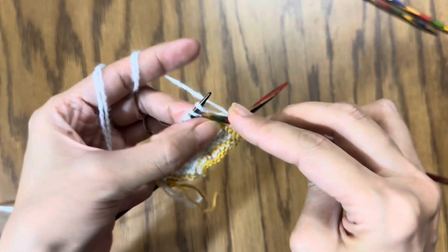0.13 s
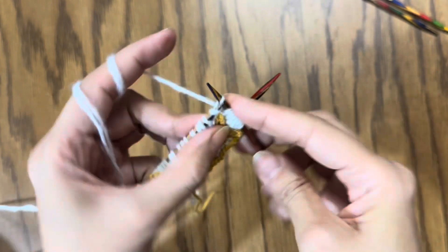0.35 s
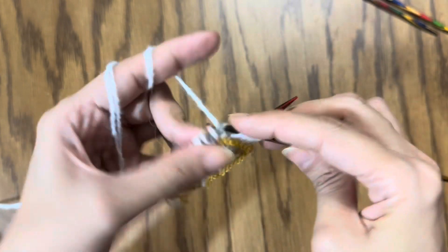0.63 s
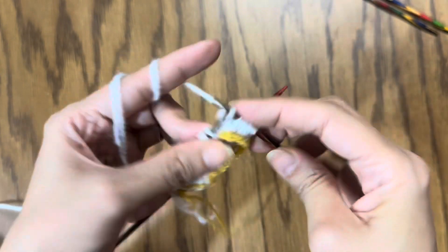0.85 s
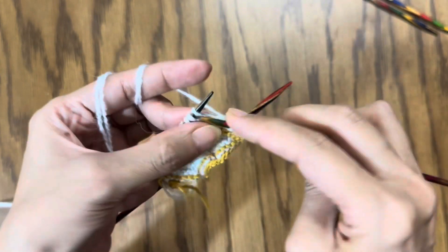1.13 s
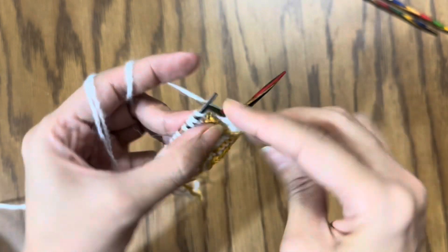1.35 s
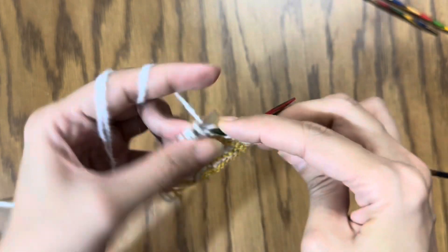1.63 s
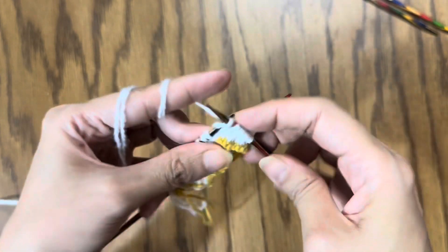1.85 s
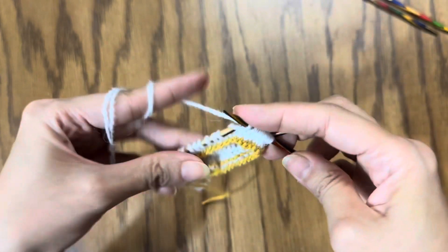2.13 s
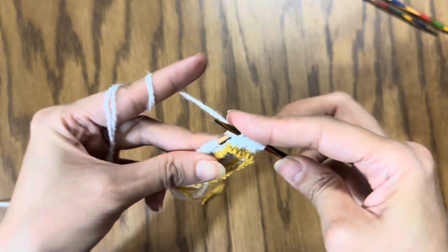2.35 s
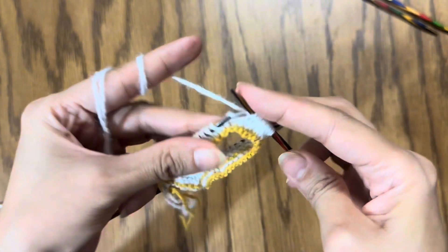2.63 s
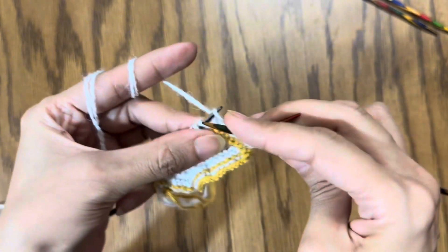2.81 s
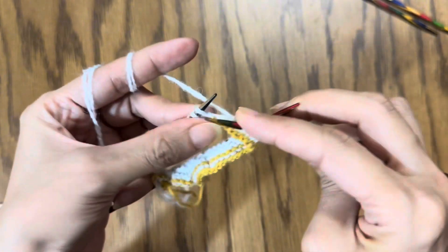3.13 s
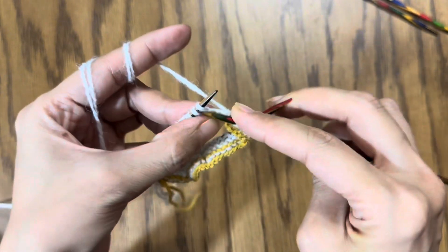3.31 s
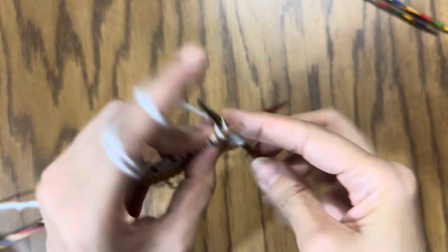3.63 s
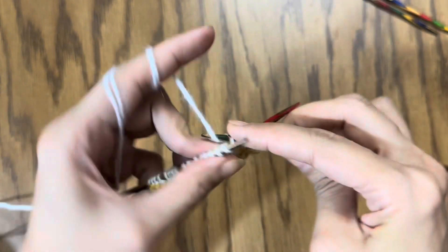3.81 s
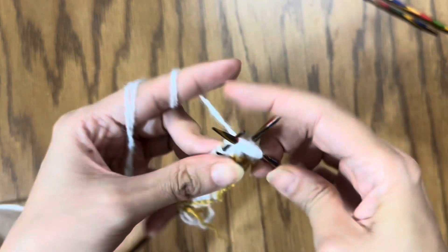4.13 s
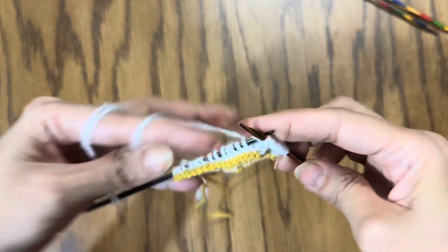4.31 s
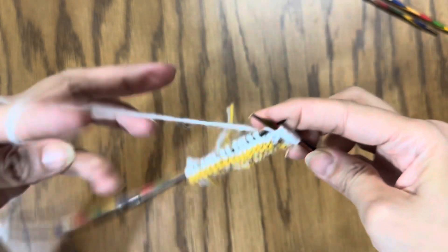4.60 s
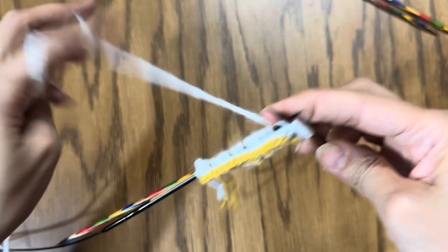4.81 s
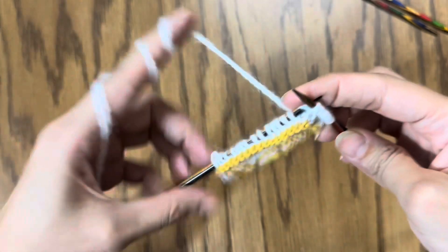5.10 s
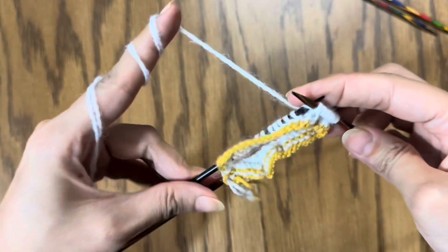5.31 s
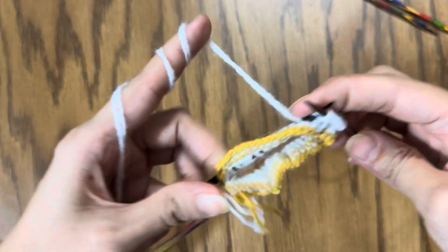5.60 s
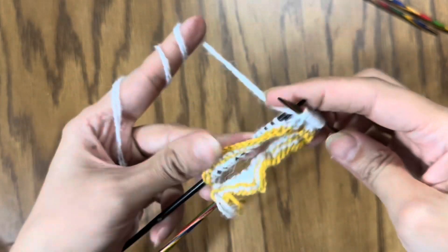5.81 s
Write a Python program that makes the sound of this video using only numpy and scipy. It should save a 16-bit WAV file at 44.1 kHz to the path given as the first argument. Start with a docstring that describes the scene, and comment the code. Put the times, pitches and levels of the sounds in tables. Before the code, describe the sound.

Needle tips scrape into loops, snap sideways with a dry click, then pull yarn through with a brief rasp and low shudder. Between stitches come light taps, fine high rustles and muffled grip changes. The sharpest clicks come before three seconds and just after five. The microphone is very near, with a short, dry room tail above soft low ventilation noise and a faint steady whine.

```python
"""Hand knitting just above a wooden table in a small, quiet room, heard from close by for six seconds.
Faint ventilation noise and an electrical whine run from start to end. Four stitches follow, at about
0.6, 1.6, 3.8 and 4.6 s: the tip rubs into a loop (swept scratching), snaps off the other needle with a
thump (clicks ringing the shafts and the work), then draws the yarn through as the work shudders (noise).
Needle taps, yarn rubs and soft hand bumps come in between; a last tap and a short rub end the scene."""
import sys
import numpy as np
from scipy import signal
from scipy.fft import rfft, irfft, next_fast_len
from scipy.io import wavfile

SR = 44100
rng = np.random.default_rng(int(sys.argv[2]) if len(sys.argv) > 2 else 0)


def pcm_store(signal):
    """Save signal as 16-bit PCM."""
    levels = np.round(np.clip(np.atleast_2d(signal), -1, 1) * 32767)
    wavfile.write(sys.argv[1], SR, levels.astype(np.int16).T)


N = 262395  # length in samples
SIZE = next_fast_len(N + SR // 2, real=True)  # padded so that filter tails do not wrap around
FREQS = np.arange(SIZE // 2 + 1) * SR / SIZE
TIME = np.arange(N) / SR
CUTOFF_HZ = 16400


def from_db(db):
    """Turn decibels into gain."""
    return 10 ** (np.asarray(db) / 20)


def rms_one(x):
    """Scale to rms 1."""
    return x / np.sqrt(np.mean(x ** 2) + 1e-20)


def over_hz(points):
    """Read a table at every frequency, with straight lines between its points on a log-frequency axis."""
    hz, value = np.transpose(points)
    return np.interp(np.log(FREQS + 1), np.log(hz), value)


def colour(x, spectrum):
    """Filter to the given spectrum without any sound ahead of its cause (minimum phase)."""
    cepstrum = irfft(np.log(from_db(over_hz(spectrum))), SIZE)
    cepstrum[0] /= 2
    response = np.exp(rfft(2 * cepstrum[:SIZE // 2], SIZE))
    return irfft(rfft(x, SIZE) * response, SIZE)[..., :N]


def ring(x, hz, t60):
    """Let clicks ring a resonance: a unit click starts a sine of height 1, 60 dB down after t60 seconds."""
    r = from_db(-60 / (t60 * SR))
    w = 2 * np.pi * hz / SR
    return signal.lfilter([0, np.sin(w)], [1, -2 * r * np.cos(w), r * r], x + 1e-18)


# a stroke catches faster than it lets go (shares of its length)
STROKE_RISE, STROKE_FALL = 0.85, 1.286


def swell(middle, length):
    """Lopsided bell of a stroke, above half power for about its length: its samples and its gains."""
    span = slice(max(0, int((middle - 2 * length) * SR)), int((middle + 3 * length) * SR))
    t = (TIME[span] - middle) / length
    side = np.where(t < 0, STROKE_RISE, STROKE_FALL)
    return span, 2 ** (-2 * (t / side) ** 2)


# how alike diffuse sound is in the left and right channels: (f/Hz, likeness 0-1)
CHANNEL_LIKENESS = [(60, .97), (250, .84), (700, .1), (1300, .82), (2200, .8), (4500, .6), (8500, .55),
                    (12000, .9), (15000, .6)]


def diffuse(pair):
    """Blend two unrelated signals into a partly alike left and right, as for sound from many directions."""
    alike = np.clip(over_hz(CHANNEL_LIKENESS), 0, .99)
    mid, side = rfft(pair, SIZE) * np.sqrt([(1 + alike) / 2, (1 - alike) / 2])
    return irfft([mid + side, mid - side], SIZE)[:, :N]


# stitches: (snap t/s, its tick level/dB, its ring level/dB, lead of the entering tip t/s,
# its rub level/dB, length of the draw t/s, glide level/dB, drag level/dB, shudder level/dB, shudder f/Hz)
STITCHES = [(0.5917, 8.5, -24, .268, -52.5, 0.099, -48.5, -44, -38, 230.3),
            (1.603, 8, -26, 0.23, -49, 0.09, -44.5, -43.5, -44, 194),
            (3.7872, 4.5, -27.5, .235, -49.5, 0.1, -48, -51, -55, 196),
            (4.6068, 0, -32, 0.21, -60.5, 0.047, -42.5, -43.5, -45.5, 197)]
# needle taps between the snaps: (t/s, tick of the tips level/dB, ring of the shafts level/dB,
# manner: 0 = slips off sideways, 1 = knocks head on, hollow knock f/Hz)
TAPS = [(0.4213, -9.5, -47, 0.16, 800), (1.343, -26, -47, .1, 799), (1.4556, -3.5, -43, 0.089, 805),
        (2.1375, -8.5, -40, 0.35, 810), (2.7634, 14, -26, 0.81, 788), (2.9297, -33, -34, 1, 693),
        (3.031, -42, -44, 0.87, 880), (3.058, -32, -53, 0.4, 800), (3.1252, -37, -43, 0.77, 1380),
        (3.313, -41, -46, 0.4, 800), (3.5821, -5, -42, 0.05, 800), (3.696, -23, -52, .1, 800),
        (3.9345, -16, -42, 0.43, 800), (4.931, -22, -46, .3, 800), (5.1116, 18.5, -26.5, 1, 870),
        (5.2284, -17, -42.5, 0.49, 800), (5.355, -22, -46, 0.35, 800), (5.8988, -17.5, -43, 0.29, 810)]


def needle_contacts():
    """The sideways snap of each stitch and the taps between: (t/s, tick level/dB, ring level/dB, manner)."""
    snaps = [(s, tick_db, ring_db, 0) for s, tick_db, ring_db, *_ in STITCHES]
    return snaps + [tap[:-1] for tap in TAPS]


# ways the hand-damped needles vibrate: (f/Hz, after a slip level/dB, after a knock level/dB,
# under sliding yarn level/dB, time to fall 60 dB t/s)
NEEDLE_MODES = [(678, -13.5, -20, -9, 0.046), (1068, -14.5, -52, -3.5, 0.066),
                (1405, -16.5, -22.5, 4, 0.055), (1652, -10.5, -5, -2, 0.011), (2077, -3, -8, 3.5, 0.018),
                (2220, -1.5, -17, -7, .013), (2563, -5, -40, 1, 0.018), (2735, -7.5, -40, -7, 0.032),
                (3070, -12.5, -24, -2.5, 0.017), (3505, -7.5, -10.5, -4, 0.018), (3955, -19, -28, -5, .014),
                (4455, -15, -17, -5, 0.013), (5120, -11, -7, -4.5, 0.018), (5720, -22, -20, -3.5, 0.012),
                (6430, -5.5, -13, 1, 0.017), (7140, -10.5, -8, -4, 0.017), (7990, -8, -30, -3, 0.012)]
# tick of the tips slipping off sideways: (f/Hz, level/dB)
SLIP_TICK = [(200, -34), (700, -22), (2000, -20), (4000, -19), (6000, -16), (7300, -13), (9000, -14),
             (11000, -10), (12500, -7), (14000, 0), (15200, -2), (16500, -17)]
# tick of the hard tips meeting head on: (f/Hz, level/dB)
HEAD_ON_TICK = [(200, -44), (550, -36), (900, -26), (1250, -36), (2000, -26), (2600, -35), (3400, -23),
                (4000, -27), (5000, -18), (7300, -15), (9000, -14), (11000, -8.5), (12500, -5), (14000, 1),
                (15200, -5), (16500, -24)]
# a tap whose tick stands less than HARD_TICK_DB over its ring is cushioned by yarn and loses high modes
HARD_TICK_DB, CUSHION_HZ, CUSHION_DB_PER_OCTAVE = 27, 1740, 10


def contacts(chatter_t60, chatter_db, mode_spread_db):
    """Each contact is a hard touch and a few ms of chatter; it ticks at the tips and rings the shafts."""
    t = TIME[:SR // 40]
    mode_hz, slip_db, knock_db, _, t60 = np.transpose(NEEDLE_MODES)
    tips, shafts = np.zeros((2, N)), np.zeros((len(mode_hz), N))
    for s, tip_db, shaft_db, manner in needle_contacts():
        at = round(s * SR)
        touch = rng.standard_normal(len(t)) * from_db(-60 * t / chatter_t60)
        touch *= from_db(chatter_db) / np.linalg.norm(touch)
        touch[0] = 1
        tips[int(manner > .5), at:at + len(t)] += from_db(tip_db) * touch[:N - at]
        # the manner and place of contact decide how strongly each mode answers
        mode_db = slip_db + np.clip(manner, 0, 1) * (knock_db - slip_db)
        cushion = np.clip(1 - (tip_db - shaft_db) / HARD_TICK_DB, 0, 1)
        octaves_above = np.maximum(np.log2(mode_hz / CUSHION_HZ), 0)
        mode_db -= cushion * CUSHION_DB_PER_OCTAVE * octaves_above
        place_db = mode_spread_db * rng.standard_normal(len(mode_hz))
        shafts[:, at] += from_db(shaft_db + mode_db + place_db)
    ticks = colour(tips[0], SLIP_TICK) + colour(tips[1], HEAD_ON_TICK)
    # neighbouring modes start in opposite directions
    rings = sum((-1) ** k * ring(shafts[k], hz, t60[k]) for k, hz in enumerate(mode_hz))
    return ticks + rings


# hollow knock of a head-on tap (level against its ring, time to fall 60 dB)
KNOCK_DB, KNOCK_T60_S = -1, 0.024


def knocks():
    """The more head on a tap lands, the more the needle bounces in the fingers: a knock pitched by the grip."""
    out, t = np.zeros(N), TIME[:SR // 20]
    for s, _, shaft_db, manner, hz in TAPS:
        at = round(s * SR)
        knock = np.sin(2 * np.pi * hz * t) * from_db(-60 * t / KNOCK_T60_S)
        out[at:at + len(t)] -= manner ** 2 * from_db(shaft_db + KNOCK_DB) * knock[:N - at]
    return out


BENDING_DELAY_S = .0028  # time a 1 kHz bending wave takes along the shaft


def dispersed(x):
    """Bending waves run down the shaft faster the higher their pitch, so a click chirps downward."""
    delay_s = BENDING_DELAY_S * np.sqrt(1000 / np.clip(FREQS, 600, CUTOFF_HZ))
    # delays count from the arrival of the fastest wave
    phase = 2 * np.pi * np.cumsum(delay_s - delay_s[-1]) * SR / SIZE
    return irfft(rfft(x, SIZE) * np.exp(-1j * phase), SIZE)[:N]


THUMP_DELAY_S = 0.00503  # from the snap to the thump of the work
# ways the held work vibrates: (f/Hz, against the snap's ring level/dB, time to fall 60 dB t/s)
THUMP_MODES = [(300.4, -7.5, 0.13), (331, -13, 0.15)]


def thumps():
    """Just after each snap a jolt sets the held work swinging in low tones that die quickly."""
    jolts = np.zeros(N)
    for s, _, ring_db, *_ in STITCHES:
        jolts[round((s + THUMP_DELAY_S) * SR)] = from_db(ring_db)
    return sum(from_db(db) * ring(jolts, hz, t60) for hz, db, t60 in THUMP_MODES)


# the draw first glides over the tip, then drags:
# (middle and length as shares of the draw, brightness 0-1, sweep in octaves)
DRAW_PHASES = [(0.28, 0.3, 0.96, -0.08), (.79, .28, 0.36, -0.37)]
# yarn pulled tight or shifted along a needle: (middle t/s, length t/s, level/dB,
# brightness: 0 = coarse drag, 1 = light glide, sweep in octaves)
RUBS = [(.435, 0.028, -53.5, .3, -0.52), (0.86, 0.059, -52.5, 0, -0.53), (1.065, 0.047, -59.5, 0, -0.16),
        (1.769, 0.051, -49, 0.088, -.2), (1.935, 0.021, -53, 0.21, -0.16), (1.982, 0.036, -46, 0.12, -0.07),
        (2.187, 0.056, -52, 0.75, 0.9), (2.378, 0.031, -55.5, 0.57, 0.075), (2.554, 0.058, -61, 1, -0.1),
        (3.046, 0.09, -60.5, 0.0, 0.036), (3.621, 0.036, -61.5, 1, -.3), (3.94, 0.013, -47.5, 0.99, -0.36),
        (4.097, .036, -54, 0, 0.49), (4.228, 0.032, -51.5, 0.1, -0.044), (4.297, 0.059, -58, 0.49, 0.1),
        (4.496, 0.049, -54, 0.3, -0.4), (4.6, 0.014, -50, 0.65, 0.54), (5.238, 0.02, -54, 0.79, -0.45),
        (5.94, 0.012, -59, 1, 0)]
# the entering tip starts bright and sweeps down
ENTRY_LENGTH_S, ENTRY_BRIGHTNESS, ENTRY_SWEEP_OCTAVES = 0.05, 1, -.6


def yarn_strokes():
    """Entry and draw of each stitch, and the rubs between, with the columns of RUBS."""
    strokes = []
    for s, _, _, lead_s, entry_db, draw_s, glide_db, drag_db, *_ in STITCHES:
        strokes.append((s - lead_s, ENTRY_LENGTH_S, entry_db, ENTRY_BRIGHTNESS, ENTRY_SWEEP_OCTAVES))
        for (middle, length, bright, sweep), db in zip(DRAW_PHASES, (glide_db, drag_db)):
            strokes.append((s + middle * draw_s, length * draw_s, db, bright, sweep))
    return strokes + RUBS


FIDGETS_PER_S, FIDGET_LENGTH_S, FIDGET_DB = 4.4, 0.005, -59.5


def fidgets():
    """The fingers never rest: faint rustles at random times and of any brightness, as in RUBS."""
    gaps, brightness = rng.random((2, 60))
    times = np.cumsum(2 * gaps / FIDGETS_PER_S)
    return [(s, FIDGET_LENGTH_S, FIDGET_DB, bright, 0)
            for s, bright in zip(times, brightness) if s < TIME[-1]]


def fibres(per_s, size_spread_db, clump_db):
    """Fibres catch and let go: dense tiny slips of uneven size, clumping as each ply passes."""
    sizes = from_db(size_spread_db * np.minimum(rng.exponential(1, (2, N)), 4))
    grip = np.interp(TIME * 110, np.arange(700), rng.standard_normal(700))  # 110 new values a second
    happens = rng.random((2, N)) < per_s / SR
    return from_db(clump_db * grip) * sizes * rng.standard_normal((2, N)) * happens


# singing modes: sharpness, and the share of the sweep by which they bend
SCRATCH_Q, MODE_BEND = 35, .17
SCRATCH_SPREAD_OCTAVES = 1.04  # how far around the centre the modes still answer


def sliding_ring(x, hz):
    """A narrow resonance whose pitch follows a curve; rms 1."""
    turn = np.exp(2j * np.pi * np.cumsum(hz) / SR)
    r = np.exp(-np.pi * np.mean(hz) / SCRATCH_Q / SR)
    # shift the pitch down to zero, smooth, and shift it back up
    smooth = signal.lfilter([1 - r], [1, -r], x * turn.conj())
    return rms_one((turn * smooth).real)


def scratch(slips, centre_hz, octaves):
    """Slips excite the needle modes around a sweeping centre; the modes bend along as the contact travels."""
    mode_hz, _, _, slide_db, _ = np.transpose(NEEDLE_MODES)
    distance = np.log2(mode_hz / centre_hz)[:, None] - octaves
    gains = from_db(slide_db)[:, None] / (1 + (distance / SCRATCH_SPREAD_OCTAVES) ** 4)
    gains /= np.linalg.norm(gains, axis=0)
    bend = 2 ** (MODE_BEND * octaves)
    return sum(gain * sliding_ring(slips, hz * bend) for gain, hz in zip(gains, mode_hz))


# colour of stitches dragged along a needle: (f/Hz, per Hz level/dB)
RASP = [(200, -1), (450, -11.5), (700, 1.5), (1100, 4.5), (1250, -5), (1500, 3), (2200, 1), (3200, 1),
        (4500, 1.5), (6200, -5.5), (9000, -13.5), (16000, -57)]
# colour of tips and skin gliding over yarn: (f/Hz, per Hz level/dB)
HISS = [(1000, -20), (4000, -8), (7000, -2), (9500, -4), (12000, -2), (14000, 2), (15600, 2), (16300, -18)]
# the lighter the stroke, the higher and stronger its scratch and the more hiss against rasp
SCRATCH_HZ, SCRATCH_RISE_OCTAVES = 1640, 1.69
SCRATCH_DB, SCRATCH_RISE_DB = -3, 9  # against the rasp; rise from coarse to light
HISS_DB, HISS_RISE_DB = -18, 13.5  # against the stroke; rise from coarse to light


def slides():
    """Stitches dragged along a needle rasp and make its modes sing; tips and skin gliding over yarn hiss."""
    slips = rms_one(colour(fibres(per_s=6000, size_spread_db=1.2, clump_db=2.1), RASP))
    out, hiss_power = np.zeros((2, N)), np.zeros(N)
    for middle, length, rasp_db, brightness, sweep in yarn_strokes() + fidgets():
        hiss_db = rasp_db + HISS_DB + HISS_RISE_DB * brightness
        scratch_hz = SCRATCH_HZ * 2 ** (SCRATCH_RISE_OCTAVES * np.clip(brightness, 0, 1))
        span, stroke = swell(middle, length)
        octaves = sweep * (TIME[span] - middle) / length
        singing = scratch(slips[:, span], scratch_hz, octaves)
        singing_gain = from_db(SCRATCH_DB + SCRATCH_RISE_DB * brightness)
        rasp = rms_one(slips[:, span]) + singing_gain * singing
        out[:, span] += from_db(rasp_db) * stroke * rms_one(rasp)
        hiss_power[span] += (from_db(hiss_db) * stroke) ** 2
    hiss = rms_one(colour(fibres(per_s=17000, size_spread_db=1, clump_db=2.5), HISS))
    return diffuse(out + np.sqrt(hiss_power) * hiss)


# a needle skates lightly through the yarn: (middle t/s, length t/s, level/dB)
SKATES = [(.305, .025, -58), (.85, .06, -61), (1.265, .02, -62), (1.555, .008, -58), (2.21, .04, -52.5),
          (2.38, .028, -46), (2.735, .025, -58), (3.45, .05, -65), (3.55, .04, -54), (4.112, .03, -53),
          (4.28, .08, -62), (4.43, .025, -56), (5.38, .02, -60)]
# colour of the skating: (f/Hz, per Hz level/dB)
SKATE_COLOUR = [(1000, -30), (4000, -14), (7000, -8), (9500, -6), (12000, -2), (14000, 2), (15600, 1),
                (16300, -18)]
# high hiss of the yarn during the drag (middle and length as shares of the draw, dB against the drag)
DRAG_HISS_MIDDLE, DRAG_HISS_LENGTH, DRAG_HISS_DB = .78, .26, -8.5


def skating():
    """Polished wood skates through the yarn, and the yarn hisses during each drag: fine, grainy, very high."""
    drags = [(s + DRAG_HISS_MIDDLE * draw_s, DRAG_HISS_LENGTH * draw_s, drag_db + DRAG_HISS_DB)
             for s, _, _, _, _, draw_s, _, drag_db, *_ in STITCHES]
    power = np.zeros(N)
    for middle, length, db in SKATES + drags:
        span, stroke = swell(middle, length)
        power[span] += (from_db(db) * stroke) ** 2
    grains = rms_one(colour(fibres(per_s=9000, size_spread_db=1, clump_db=1.8), SKATE_COLOUR))
    return diffuse(np.sqrt(power) * grains)


# dull bumps as the hands change their grip, and the short low body of the needle knock at 2.93 s: (middle t/s,
# length t/s, level/dB, f/Hz, relative width)
GRIP_BUMPS = [(0.09, 0.039, -52.5, 169, 0.36), (0.775, 0.029, -48, 190, .4), (0.96, 0.12, -51, 137, 0.74),
              (1.84, 0.051, -47, 140, 0.49), (2.027, 0.043, -45, 107, 0.66), (2.627, 0.043, -47, 109, 0.4),
              (2.73, 0.048, -49, 151, 0.46), (2.93, 0.004, -42, 500, 0.35), (2.954, 0.03, -42.5, 186, 0.34),
              (3.027, 0.04, -42, 172, 0.25), (3.2, .04, -51.5, 140, 0.37), (4.12, 0.012, -38.5, 60, 0.51),
              (4.3, .051, -44, 132, 0.55), (4.67, 0.031, -48, 216, 0.36), (4.78, 0.029, -52, 160, 0.34),
              (4.915, 0.085, -46.5, 113, 0.58), (5.11, 0.034, -43.5, 109.4, 0.1),
              (5.302, 0.014, -43.5, 122, 0.36)]
# the work shudders through the draw (middle and length as shares of the draw, relative width)
SHUDDER_MIDDLE, SHUDDER_LENGTH, SHUDDER_WIDTH = .6, .5, 0.069
# every stroke of yarn also shakes the work (dB against the stroke)
SHAKE_DB, SHAKE_HZ, SHAKE_WIDTH = 0, 161, 0.55


def pushes():
    """Shudder of each stitch, the shake of each stroke, and the grips, with the columns of GRIP_BUMPS."""
    shudders = [(s + SHUDDER_MIDDLE * draw_s, SHUDDER_LENGTH * draw_s, db, hz, SHUDDER_WIDTH)
                for s, *_, draw_s, _, _, db, hz in STITCHES]
    shakes = [(s, length, db + SHAKE_DB, SHAKE_HZ, SHAKE_WIDTH)
              for s, length, db, *_ in yarn_strokes()]
    return shudders + shakes + GRIP_BUMPS


def bumps():
    """Soft pushes shake the held work in a low, damped resonance: noise in a low band."""
    out = np.zeros(N)
    for middle, length, db, hz, width in pushes():
        span, stroke = swell(middle, length)
        band = [hz / (1 + width), hz * (1 + width)]
        body = signal.butter(2, band, "band", fs=SR, output="sos")
        # keep the end of a second of noise, once the filter has settled
        push = stroke * signal.sosfilt(body, rng.standard_normal(SR))[-len(stroke):]
        out[span] += from_db(db) * push * np.linalg.norm(stroke) / np.linalg.norm(push)
    return out


# colour of the room tail, weak at the very top: (f/Hz, level/dB)
ROOM_COLOUR = [(300, -2), (600, -2), (1000, -3), (3000, -1), (7500, -1), (10000, -1), (12500, -6),
               (14000, -10.5), (16000, -11)]
ROOM_T60_S, ROOM_DB = 0.17, -10


def room(x, build_s):
    """Dense reflections build up within a few ms and die quickly, weak at the very top."""
    t = TIME[:SR // 2]
    tail = rng.standard_normal((2, len(t))) * from_db(-60 * t / ROOM_T60_S) * (1 - np.exp(-t / build_s))
    tail /= np.linalg.norm(tail, axis=1, keepdims=True)
    coloured = colour(x, ROOM_COLOUR)
    return from_db(ROOM_DB) * diffuse(signal.fftconvolve(coloured[None], tail, axes=1)[:, :N])


# colour of the room air: (f/Hz, per Hz level/dB)
AIR_COLOUR = [(20, -28), (50, 1.5), (112, 0), (160, -4.5), (235, -3.5), (320, -9.5), (450, -17), (900, -19),
              (1250, -24), (2100, -18), (2550, -18.5), (2720, -16), (2950, -19.5), (4300, -28.5),
              (6900, -31), (7250, -25), (7600, -31), (10000, -34), (13000, -35), (14800, -30), (16000, -48)]
AIR_DB = -51.5  # rms
# steady whine: (f/Hz, rms level/dB)
WHINE = [(2717, -68), (7217, -86.5)]


def air():
    """Ventilation as steady coloured noise, with a thin electrical whine of pure tones."""
    noise = rms_one(diffuse(colour(rng.standard_normal((2, N)), AIR_COLOUR)))
    whine = sum(from_db(db) * np.sqrt(2) * np.sin(2 * np.pi * hz * TIME) for hz, db in WHINE)
    return from_db(AIR_DB) * noise + whine


TABLE_ECHO_S, TABLE_ECHO_DB = 0.002, -12


def scene():
    """Needles, yarn and hands, with an echo of the clicks off the table top, the room's tail and its air."""
    taps = contacts(chatter_t60=.010, chatter_db=1.5, mode_spread_db=1.5)
    clicks = dispersed(taps + knocks())
    echo = from_db(TABLE_ECHO_DB) * np.interp(TIME - TABLE_ECHO_S, TIME, clicks, left=0)
    handling = slides() + skating() + thumps() + bumps()
    tail = room(clicks + handling[0], build_s=.003)
    return clicks + echo + handling + tail + air()


# phase of the right channel over the left: (f/Hz, phase/rad)
CHANNEL_PHASE = [(5000, 0), (7000, .9), (9200, 2), (10500, 2.95), (13200, 3.25), (14200, 3.95),
                 (15200, 4.35), (16000, 4.3)]


def record(dry):
    """The treble is turned in phase between left and right; peaks are softly limited and the top is cut."""
    turn = over_hz(CHANNEL_PHASE) / 2
    turned = irfft(rfft(dry, SIZE) * np.exp(1j * np.array([-turn, turn])), SIZE)[:, :N]
    limited = .85 * np.tanh(turned / .85)
    top_cut = signal.ellip(10, .1, 80, CUTOFF_HZ, fs=SR, output="sos")
    return signal.sosfilt(top_cut, limited)


dry = scene()
out = record(dry)
pcm_store(out)
```